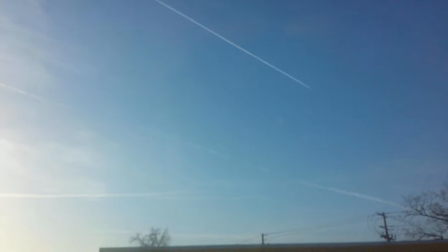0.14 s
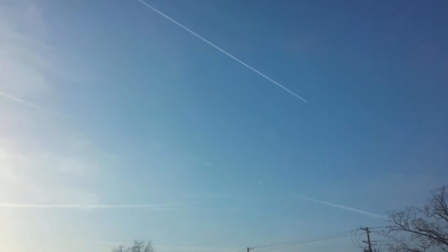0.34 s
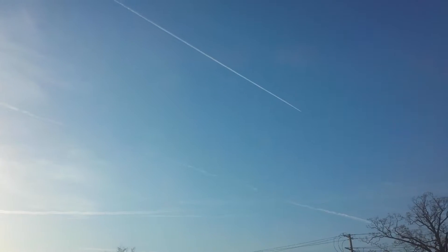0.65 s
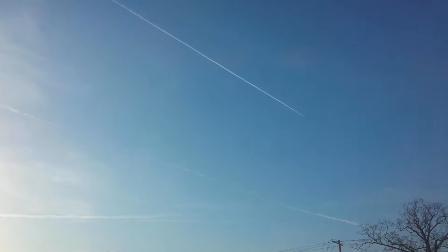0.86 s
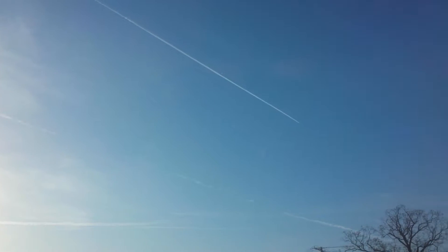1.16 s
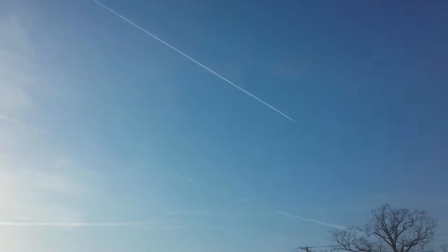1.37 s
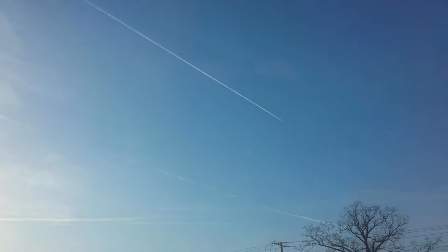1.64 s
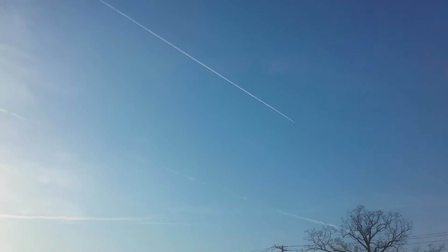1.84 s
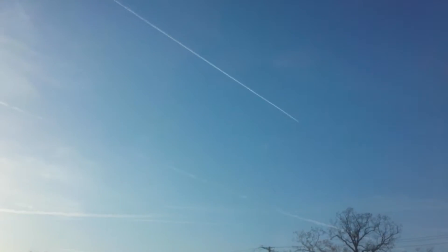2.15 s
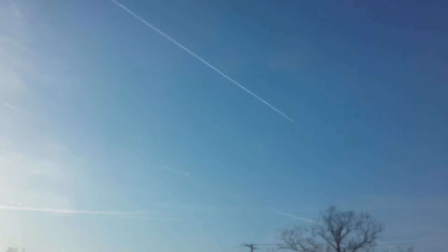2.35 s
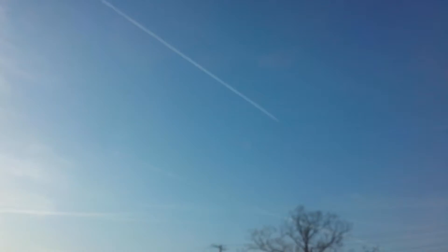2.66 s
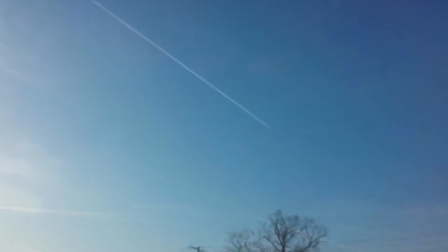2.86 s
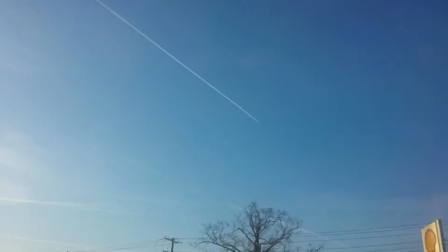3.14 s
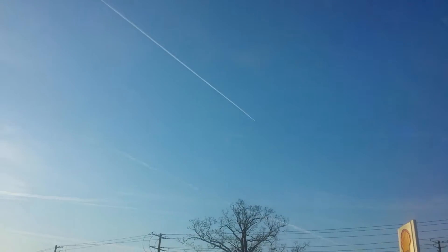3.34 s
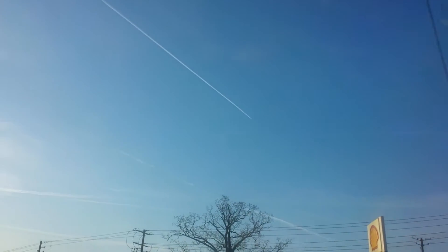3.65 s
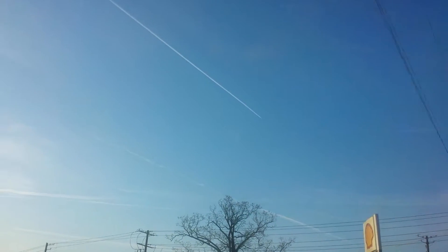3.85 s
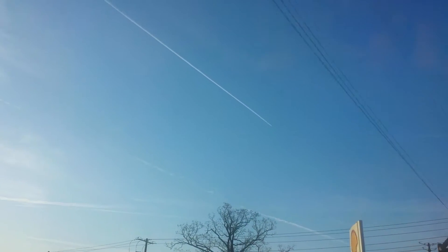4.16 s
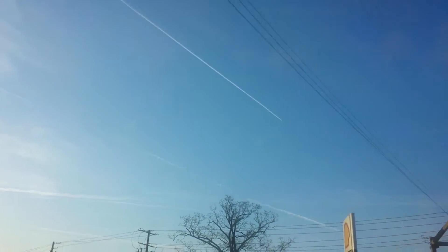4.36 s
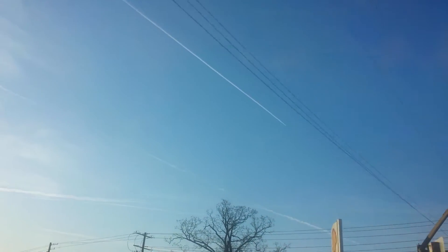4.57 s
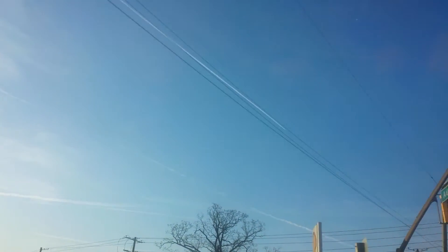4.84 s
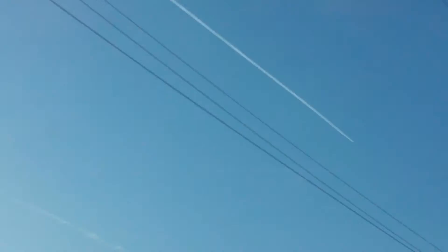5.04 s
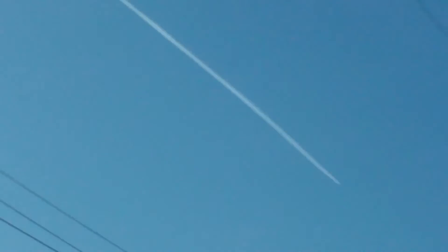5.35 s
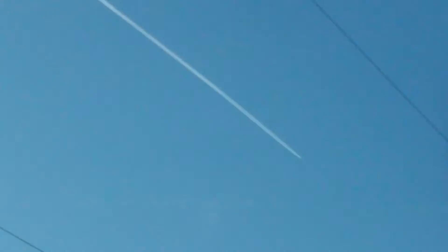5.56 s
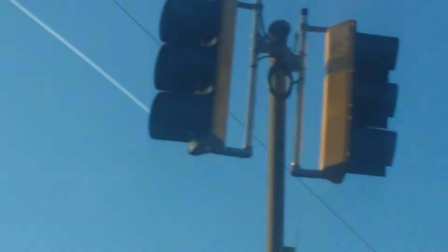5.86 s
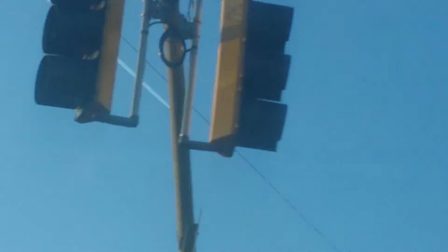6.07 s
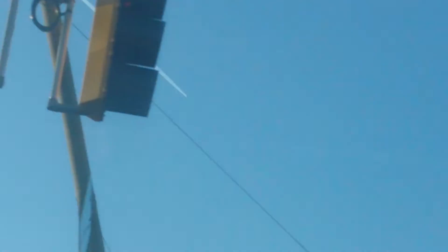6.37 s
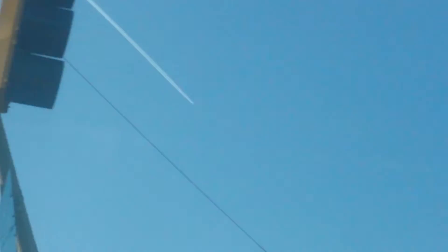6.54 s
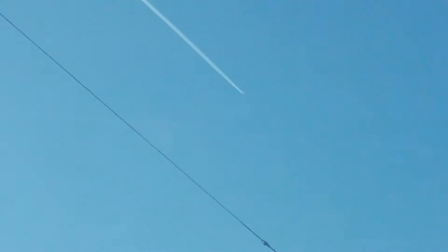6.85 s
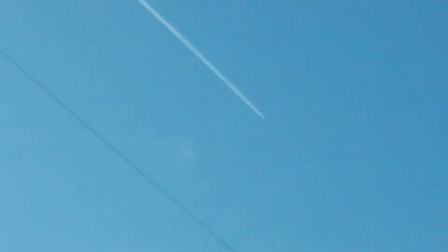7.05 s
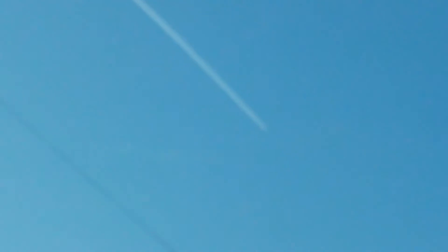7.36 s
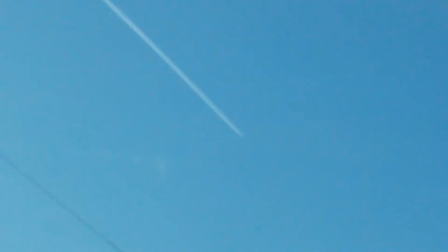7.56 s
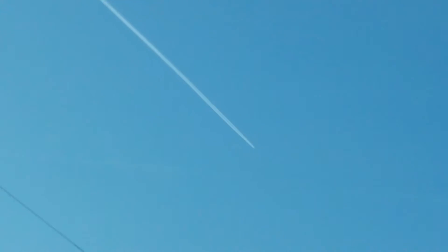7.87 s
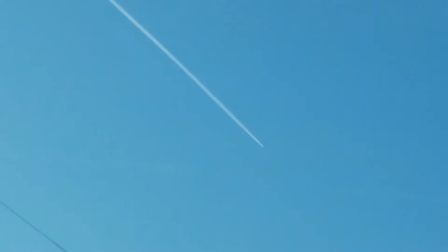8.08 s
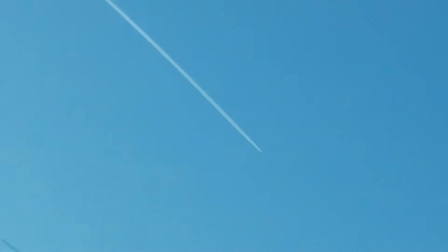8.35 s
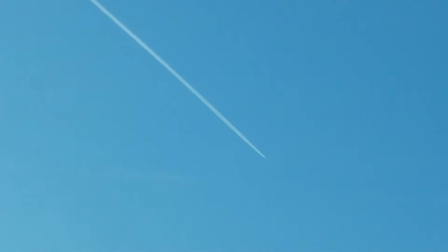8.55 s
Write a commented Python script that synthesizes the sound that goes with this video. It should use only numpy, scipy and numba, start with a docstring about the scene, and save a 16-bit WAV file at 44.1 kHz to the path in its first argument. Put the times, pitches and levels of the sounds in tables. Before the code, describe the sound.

Heard from inside a moving car on a close, handheld two-port microphone. From 0 to 1.4 s a deep eight-cylinder engine drones strongly at moderate, nearly steady speed, rising very slightly, with a light rasp over road rumble. At about 1.4 s the driver lifts off; the boom fades and the pitch falls, sharply around 2.1 to 2.5 s, to a low idle. Soft wavering hums, barely audible valve ticking, tyre thrum and hiss remain, the thrum sinking as the car slows. A faint high whistle vanishes by 3.7 s. A hand rubs the plastic casing briefly at 1.7 s and 3.7 s. Hard clicks come at 4.4 s, in a cluster at 4.8 to 5.0 s, and again at 5.4 to 5.7 s, jumping between left and right. Smaller taps and grainy rubs follow at 6.1, 6.5, 6.8, 7.7 and 8.5 s over quiet rumble, until the end near 8.7 s.

```python
"""An eight-cylinder engine heard inside a car: it pulls, the driver lifts off and the car rolls down to idle.
The engine is a stack of sine tones locked to its turning, with passing hums and three ticking valves.
A hand on the plastic casing of a two-port microphone makes clicks (ringing modes) and rubs (grainy noise).
Behind them, shaped noise makes the road rumble, tyre thrum, hiss, a faint whistle and microphone hiss."""
import sys
import numpy as np
from scipy import signal
from scipy.fft import rfft, irfft, next_fast_len
from scipy.io import wavfile
from numba import njit

SR = 44100
rng = np.random.default_rng(int(sys.argv[2]) if len(sys.argv) > 2 else 0)


def file_out(sig):
    """Save sig as 16-bit WAV at sys.argv[1]."""
    # one column per channel
    cols = np.atleast_2d(sig).T
    # limit, then scale
    lim = np.clip(cols, -1, 1)
    pcm = np.round(lim * 32767).astype(np.int16)
    wavfile.write(sys.argv[1], SR, pcm)


N = 384111

# Speed of the crankshaft: time_s, speed_rpm
ENGINE_SPEED = [(0.0, 1682), (0.35, 1691), (0.65, 1670), (1.05, 1726), (1.4, 1727), (1.85, 1610),
                (2.1, 1470), (2.4, 960), (2.6, 872), (3.25, 852), (3.7, 771), (4.2, 729), (5.1, 788),
                (5.5, 749), (5.75, 715), (6.45, 715), (6.6, 775), (6.9, 778), (7.3, 679), (7.7, 651),
                (8.2, 674)]
# Tones that follow the firing level: multiple_of_cycle (a cycle is two turns), level_db, waver_db
FIRING_TONES = [(3, -29, 2), (5, -16, 2.5), (6, -19, 2.5), (8, 0, .8), (9, -23, 2), (12, -25, 2),
                (14, -31, 1), (16, -21.5, .7), (17, -21.5, .5), (21, -23, .5)]
# Tones that follow the exhaust rasp level: multiple_of_cycle, level_db, waver_db
RASP_TONES = [(20, -1, .7), (24, -1.5, .7), (26, -3, .7), (33, -21, 2), (40, -26, 3), (48, -29, 3),
              (56, -26, 2)]
# Tone at twice the firing rate: multiple_of_cycle, level_db, waver_db
COASTING_TONES = [(16, 0, 0.35)]
# Hums that come up for a while: start_s, hold_s, pitch_hz, sag_hz_per_s, level_db
HUMS = [(0.944, 0.25, 275.7, 3.5, -31), (2.5, 0.58, 290, 2, -41), (0.998, 0.48, 84, -0.5, -29.5),
        (1.552, 0.64, 73, 0, -33.5), (1.997, 0.74, 84, 2.5, -34.5), (2.85, 0.47, 115.3, 0, -28.5),
        (2.999, 0.45, 69.45, 1.5, -26), (4.401, 1.38, 120.5, 0.5, -30.5), (2.9, 1.904, 172.8, 3, -37.5),
        (3.4, 0.66, 134, 0, -38.5), (4.198, 0.33, 225.2, -2, -40.5), (6.103, 0.47, 257, 1, -43.5),
        (7.5, 1.2, 259.7, 4.5, -42), (7.85, 1, 116, -2, -34.5)]
# Ticking valves: share_of_cycle, strength_db
VALVE_TICKS = [(0, -53), (.385, -54.5), (.64, -57)]
# Ringing of a struck valve: pitch_hz, strength_db, time_to_fall_60_db_s
VALVE_RINGING = [(3940, -1, .05), (4140, -2, .035)]
# Air and panel modes of the cabin: pitch_hz, width_hz, boost_db
CABIN_MODES = [(75.4, 5.5, 3), (97.6, 4.1, 6), (119.9, 5.8, 4.5), (171.1, 9.5, 7), (222.3, 7.5, 6),
               (259.8, 7.6, 6.5), (288.6, 9, 7), (361.3, 16, 4.5)]
# Clicks of the casing: time_s, middle_db, then against the middle: thud_db, knock_db, high_db;
# last, left_minus_right_db
CASING_CLICKS = [(2.1433, -44.5, -5, -5, 3, 8), (3.7262, -54, -22, -20, 4, -8),
                 (3.736, -50, -20, -20.5, 1, -1), (3.761, -49, -20, -20, 1, 0),
                 (3.8024, -45, -9, -26, 4.5, 0), (4.411, -42, -17, -4, -14, 7),
                 (4.4227, -41.5, -23, 12, -15, 11.5), (4.424, -23.5, -43, -25, -14.5, 10.5),
                 (4.7873, -41.5, -4, -14, -28, -24.5), (4.818, -27.5, -16.5, -4, -18, -14.5),
                 (4.828, -62, -20, -20, 4, 0), (4.8477, -40, -11, -1, -3, 5),
                 (4.8508, -43, -14, -9, -2.5, 20), (4.8548, -52, -8, -12, 1, 0), (4.8834, -53, 0, 4, -8, 2),
                 (4.9172, -51, -18, -19, -7, -14), (4.9685, -46, -19, -1.5, -8, 16),
                 (5.399, -43.5, -20, -2, -13, 2), (5.4849, -57, 1, 1, 6, 10),
                 (5.5467, -28.5, -17, -7, -25, -16), (5.5652, -33.5, -2.5, 1, -18, 14),
                 (5.568, -45, -16, 11, -12, 12), (5.5762, -37, -10, -11, -9, 7),
                 (5.5786, -29, -36, 8, -13.5, 9.5), (5.721, -46, -21, -20, -1, 3),
                 (6.128, -47, -23, -23, 8, -1), (8.446, -60, 9, 9, -13, -10)]
# Ringing of the casing: pitch_hz, strength_db, time_to_fall_60_db_s
CASING_MODES = [(620, 30.5, 0.0031), (1060, 11.5, 0.0071), (1410, 10.5, 0.004), (1970, 10.5, 0.0024),
                (3270, 9.5, 0.0025), (5130, 19.5, 0.0031), (6450, 18.5, 0.0057), (7500, 18, 0.0055),
                (8900, 18, 0.0021), (12700, 13, 0.0018)]
# Hand rubbing on the casing: start_s, rise_s, hold_s, fall_s, bright_db, dull_minus_bright_db
RUB_STROKES = [(1.724, 0.08, 0.014, 0.04, -48, -2), (3.698, 0.084, 0.022, 0.029, -39, -16),
               (3.78, 0.14, 0.091, 0.65, -48, -4), (5.533, 0.092, 0.26, 0.27, -52, -4.5),
               (6.106, 0.018, 0.0032, 0.13, -44, -15), (6.472, 0.099, 0.078, 0.1, -50, -2.5),
               (6.744, 0.07, 0.065, 0.044, -54.5, -1), (7.71, .05, 0.035, 0.05, -49.5, 1),
               (8.457, 0.18, .2, 0.04, -47.5, -3)]
# Colour of the bright and dull parts of a rub: pitch_hz, level_db (per Hz)
RUB_BRIGHT_COLOUR = [(2500, -17.5), (4000, -15.5), (5200, -8), (6500, -4.5), (7600, -10), (9000, -13.5),
                     (12000, -22), (14600, -34)]
RUB_DULL_COLOUR = [(1000, -8), (1300, 0.5), (1550, -0.5), (1900, -7.5), (3200, -6.0), (4500, -25)]
# Speed of the car: time_s, speed_kmh
CAR_SPEED = [(0, 35.8), (1.2, 39), (3, 36.7), (5.5, 31.4), (6.1, 26), (7.6, 25.5), (8.71, 22.4)]
# Slow changes in the level of the rumble and thrum: time_s, change_db
ROAD_LEVEL = [(0, 3), (1.5, -0.5), (2.4, -0.5), (3.5, -1.5), (6, -1.5), (6.8, 0.5), (7.2, 0.5),
              (7.55, -3.5), (8.1, -2.5), (8.71, -1)]
# Colours of the rumble, the thrum before it is swept, and the hiss: pitch_hz, level_db (per Hz)
RUMBLE_COLOUR = [(20, -29), (30, -17), (38, -14.5), (58, -18.5), (90, -7.5), (125, -1), (170, -9),
                 (195, -13.5), (230, -10.5), (295, -17.5), (325, -20.5), (400, -26.5), (500, -26.5),
                 (670, -36), (1500, -43), (2500, -83.5)]
THRUM_COLOUR = [(15, -18.0), (100, -2.5), (300, 3.0), (600, -40.5)]
HISS_COLOUR = [(530, 0.5), (900, 0), (1050, -7.5), (1420, -8.5), (1850, -6), (2080, -5.5), (2860, -6.5),
               (3100, -7.5), (3520, -11), (4450, -12.5), (6770, -7.5), (8350, -19), (11000, -28.5),
               (14600, -47.5)]
# Air whistling at a gap: time_s, pitch_hz, level_db
GAP_WHISTLE = [(0, 6830, -63), (0.6, 6800, -62), (1.6, 6770, -63), (2.0, 6900, -66), (2.4, 6970, -66),
               (3.3, 6970, -68), (3.7, 6970, -85)]
# Colour of the steady microphone hiss: pitch_hz, level_db (per Hz)
SELF_NOISE_COLOUR = [(3000, -25), (8000, 2), (11000, -2.5), (14600, -8.5)]
# How alike noise is at the two ports: pitch_hz, likeness (1 is identical, 0 is unrelated)
PORT_LIKENESS = [(60, 0.95), (150, 1), (350, 1), (700, 0.39), (1500, 0.24), (4000, 0.027), (9000, 0.028),
                 (14000, 0.17)]
# Which port gets more of the noise: pitch_hz, left_minus_right_db
PORT_LEANING = [(60, 1), (130, 0), (290, -1.5), (620, 2), (1360, -2.5), (2970, -4.5), (6490, -0.5),
                (14200, -2)]

TICK_AT_S = 7.859   # a moment at which an engine cycle begins
LIFT_S, LIFT_SETTLE_S = 1.408, 0.28   # the driver lifts off; firing dies down towards off load
PULL_DB, IDLE_DB = -12.5, -36   # firing under load and off load, before the cabin boost
RASP_DB, RASP_FADE_S, RASP_FALL_DB_PER_S = -32, 0.84, 21   # holds, then fades from this time
# Heard while the engine brakes near idle speed; the level is before the cabin boost
COASTING_DB, COASTING_S, COASTING_HOLD_S = -37, 2.72, 3.7
HUM_FADE_S = 0.21
RUB_EDGE_DB = 11.5   # a stroke swells over this range, fading in and out below it
THRUM_HZ_PER_KMH = 2.037
THRUM_WIDTH = .36   # share of the centre frequency
# Starting levels, before the slow changes and flicker, and the loss each time the car's speed halves
RUMBLE_DB, RUMBLE_LOSS_DB = -25, 7.5
THRUM_DB, THRUM_LOSS_DB = -24.5, 12.5
HISS_DB, HISS_LOSS_DB = -44, 1.5
HISS_RPM_LOSS_DB = 4   # lost each time the engine speed halves
WHISTLE_BLUR_HZ = 30   # half width of each band
WHISTLE_UPPER, WHISTLE_UPPER_DB = 1.11, -2   # a weaker band above: pitch ratio, level
SELF_NOISE_DB = -61
LEFT_LEAD_S = 0.000264   # the shaped noise reaches the left port first
CUTOFF_HZ = 14550


def engine():
    """Firing, exhaust and coasting tones locked to the crankshaft, with hums and valve ticks."""
    t = np.arange(N) / SR
    cycle_hz = in_time(ENGINE_SPEED)[0] / 120   # one cycle is two turns
    cycles = np.cumsum(cycle_hz) / SR
    cycles = cycles - cycles[round(TICK_AT_S * SR)]
    # Eight cylinders fire in a cycle; the boom is louder on a cabin mode
    lift_off = np.exp(-np.maximum(t - LIFT_S, 0) / LIFT_SETTLE_S)
    firing_db = IDLE_DB + (PULL_DB - IDLE_DB) * lift_off + cabin_db(8 * cycle_hz)
    firing = from_db(firing_db) * tones(FIRING_TONES, cycles)
    rasp_db = RASP_DB - RASP_FALL_DB_PER_S * np.maximum(t - RASP_FADE_S, 0)
    rasp = from_db(rasp_db) * tones(RASP_TONES, cycles)
    coasting_level = from_db(COASTING_DB + cabin_db(16 * cycle_hz))
    coasting_level = coasting_level * stroke(COASTING_S, .3, COASTING_HOLD_S, .3)
    coasting = coasting_level * tones(COASTING_TONES, cycles)
    # Tones are the same at both ports; the ticks are not
    return firing + rasp + coasting + hum() + valve_ticks(cycles)


def tones(table, cycles):
    """Sines on whole multiples of the engine cycle, each wavering in level."""
    total = 0
    for multiple, level_db, waver_db in table:
        level = np.sqrt(2) * from_db(level_db + waver_db * drift(1.2))
        total = total + level * np.sin(2 * np.pi * (round(multiple) * cycles + rng.random()))
    return total


def hum():
    """Wavering tones that fade in, drift a little in pitch and fade out."""
    t = np.arange(N) / SR
    total = 0
    for start, hold, hz, sag_hz_per_s, level_db in HUMS:
        age = t - start
        level = np.sqrt(2) * from_db(level_db + 2.0 * drift(1.6))
        turns = (hz - sag_hz_per_s * age / 2) * age
        total = total + stroke(start, HUM_FADE_S, hold, HUM_FADE_S) * level * np.sin(2 * np.pi * turns)
    return total


def valve_ticks(cycles):
    """Each valve is struck once a cycle and rings briefly, louder at the right port."""
    strikes, ticks = 0, 0
    for share, strength_db in VALVE_TICKS:
        count = np.floor(cycles - share)
        strikes = strikes + from_db(strength_db) * np.diff(count, prepend=count[0])
    for hz, strength_db, t60 in VALVE_RINGING:
        uneven = strikes * from_db(rng.normal(0, 0.67, N))
        ticks = ticks + from_db(strength_db) * ring(uneven, hz, t60)
    return ticks * from_db([[-7], [0]])


def cabin_db(hz):
    """Boost that the cabin's resonances give at a frequency."""
    return sum(boost_db / (1 + (2 * (hz - mode_hz) / width_hz) ** 2)
               for mode_hz, width_hz, boost_db in CABIN_MODES)


def clicks():
    """Each click sets all casing modes ringing, with its own strengths at each port."""
    s, middle_db, thud_db, knock_db, high_db, pan_db = np.transpose(CASING_CLICKS)
    at = np.round(s * SR).astype(int)
    out = np.zeros((2, N))
    for k, (hz, strength_db, t60) in enumerate(CASING_MODES):
        if hz < 800:
            tone_db = thud_db
        elif hz < 1700:
            tone_db = knock_db
        else:
            tone_db = high_db if hz > 4000 else 0
        chance_db = 2 * rng.normal(0, 1, (2, len(s)))
        blow_db = middle_db + tone_db + strength_db + chance_db + pan_db / 2 * [[1], [-1]]
        blows = np.zeros((2, N))
        blows[:, at] = (-1) ** k * from_db(blow_db)   # neighbouring modes start in opposite directions
        # A mode builds up over about one of its own vibrations
        push = signal.windows.hann(int(.9 * SR / hz) + 3)
        out += ring(signal.lfilter(push / push.sum(), [1], blows), hz, t60)
    return out


def rubs():
    """Skin dragging over plastic: grainy noise, a bright part and a dull part under each stroke."""
    bright, dull, rough = 0, 0, drift(84.0)
    for start, rise, hold, fall, bright_db, dull_db in RUB_STROKES:
        shape = stroke(start, rise, hold, fall)
        level_db = bright_db - RUB_EDGE_DB * (1 - shape)
        depth_db = np.clip((level_db + 58) / 8, 1, 2)   # a harder rub is grainier
        grain = np.minimum(4 * shape, 1) * from_db(level_db + depth_db * rough)
        bright = bright + grain
        dull = dull + from_db(dull_db) * grain
    return bright * ports(RUB_BRIGHT_COLOUR) + dull * ports(RUB_DULL_COLOUR)


def road():
    """Noise through the cabin modes rumbles, a moving band thrums, and air, tread and engine hiss."""
    speed, road_level_db = in_time(CAR_SPEED)[0], in_time(ROAD_LEVEL)[0]
    slower = halvings(speed)
    rumble_db = RUMBLE_DB - RUMBLE_LOSS_DB * slower + road_level_db
    rumble = from_db(rumble_db) * ports(RUMBLE_COLOUR, CABIN_MODES)
    # The tyre thrum sinks in pitch as the car slows; two sweeps make its edges steeper
    thrum_hz = THRUM_HZ_PER_KMH * speed
    wide = sweep(ports(THRUM_COLOUR), thrum_hz, THRUM_WIDTH, SR)
    narrow = rms_one(sweep(wide, thrum_hz, THRUM_WIDTH, SR))
    thrum = from_db(THRUM_DB - THRUM_LOSS_DB * slower + road_level_db) * narrow
    hiss_db = HISS_DB - HISS_LOSS_DB * slower - HISS_RPM_LOSS_DB * halvings(in_time(ENGINE_SPEED)[0])
    flicker_db = 0.7 * drift(2.1) + 0.7 * drift(25.0)
    hiss = from_db(hiss_db + flicker_db) * ports(HISS_COLOUR)
    return rumble + thrum + hiss


@njit
def sweep(x, hz, width_share, rate):
    """A band-pass filter whose centre moves, worked out sample by sample."""
    out = np.zeros_like(x)
    for c in range(x.shape[0]):
        low = band = 0.0
        for i in range(x.shape[1]):
            step = 2 * np.pi * hz[i] / rate
            low += step * band
            band += step * (x[c, i] - low - width_share * band)
            out[c, i] = band * np.sqrt(width_share / step)
    return out


def whistle():
    """Air at a gap makes two narrow bands of noise, unrelated at the two ports."""
    hz, level_db = in_time(GAP_WHISTLE)
    turns = 2 * np.pi * np.cumsum(hz) / SR
    both = []
    for port in range(2):
        # Slow chance times a sine is a narrow band around that sine
        lower = drift(WHISTLE_BLUR_HZ) * np.sin(turns) + drift(WHISTLE_BLUR_HZ) * np.cos(turns)
        upper = drift(WHISTLE_BLUR_HZ) * np.sin(WHISTLE_UPPER * turns)
        both.append(lower + from_db(WHISTLE_UPPER_DB) * upper)
    return from_db(level_db) * np.array(both)


def self_noise():
    """The microphone's own steady hiss, as shaped noise."""
    return from_db(SELF_NOISE_DB) * ports(SELF_NOISE_COLOUR)


def ports(spectrum, boosts=()):
    """Noise of this colour at the two ports, alike in the bass and less so in the treble; rms 1."""
    size = next_fast_len(N)
    hz = np.maximum(np.arange(size // 2 + 1) * SR / size, 1)
    level = from_db(at_hz(spectrum, hz))
    for mode_hz, width_hz, boost_db in boosts:
        level = level * from_db(boost_db / (1 + (2 * (hz - mode_hz) / width_hz) ** 2))
    left_right = np.array([[1], [-1]])
    mid, side = rfft(rng.standard_normal((2, size)))
    alike = np.clip(at_hz(PORT_LIKENESS, hz), -1, 1)
    pair = np.sqrt(1 + alike) * mid + np.sqrt(1 - alike) * side * left_right
    lean = from_db(at_hz(PORT_LEANING, hz) / 2 * left_right)
    lead = np.exp(1j * np.pi * hz * LEFT_LEAD_S * left_right)
    return rms_one(irfft(pair * level * lean * lead, size)[:, :N])


def ring(blows, hz, t60):
    """A unit blow sets a sine of height 1 ringing; it falls by 60 dB in t60 seconds."""
    r, w = from_db(-60 / (t60 * SR)), 2 * np.pi * hz / SR
    return signal.lfilter([0, np.sin(w)], [1, -2 * r * np.cos(w), r * r], blows + 1e-18)


def drift(rate_hz):
    """Slow chance: noise at every 40th sample, smoothed twice by a low-pass; spread 1."""
    r = np.exp(-80 * np.pi * rate_hz / SR)
    noise = rng.standard_normal(N // 40 + 2002)
    slow = signal.lfilter([1], [1, -2 * r, r * r], noise)[2000:]   # skip the filter's start
    return np.interp(np.arange(N) / 40, np.arange(len(slow)), rms_one(slow))


def stroke(start, rise, hold, fall):
    """Rise, hold and fall, from 0 to 1 and back; times in seconds."""
    return np.interp(np.arange(N) / SR, np.cumsum([start, rise, hold, fall]), [0, 1, 1, 0])


def in_time(rows):
    """Columns of a table as curves, one value a sample."""
    s, *columns = np.transpose(rows)
    return [np.interp(np.arange(N) / SR, s, column) for column in columns]


def at_hz(points, hz):
    """A table of values by pitch, read on a log-frequency axis."""
    point_hz, values = np.transpose(points)
    return np.interp(np.log(hz), np.log(point_hz), values)


def halvings(x):
    """How many times a curve has halved since its start."""
    return np.log2(x[0] / x)


def from_db(db):
    """Decibels to gain."""
    return 10 ** (np.asarray(db) / 20)


def rms_one(x):
    """Scale to an rms (average strength) of 1."""
    return x / np.sqrt(np.mean(x ** 2) + 1e-20)


def scene():
    """All sources added together at the two ports."""
    return engine() + clicks() + rubs() + road() + whistle() + self_noise()


def record(dry):
    """Peaks are rounded, then a steep low-pass cuts the top."""
    rounded = 1.167 * np.tanh(dry / 1.134)
    top = signal.ellip(16, .5, 70, CUTOFF_HZ, fs=SR, output="sos")
    return signal.sosfilt(top, rounded)


dry = scene()
out = record(dry)
file_out(out)
```